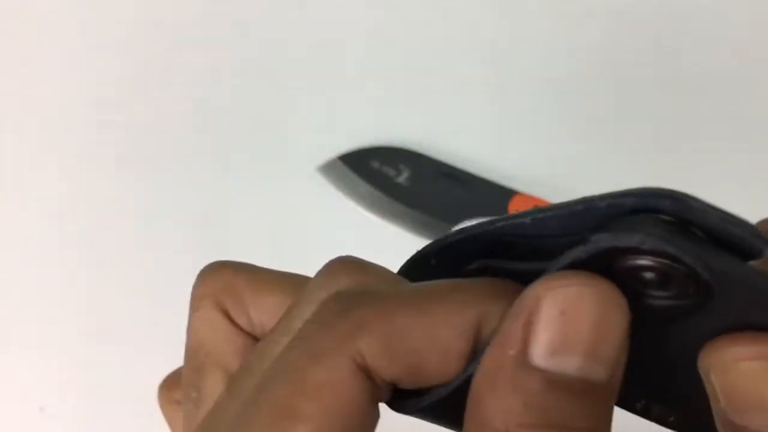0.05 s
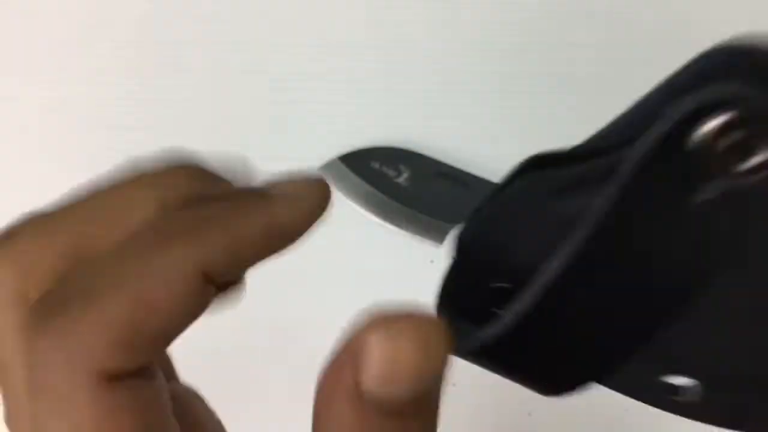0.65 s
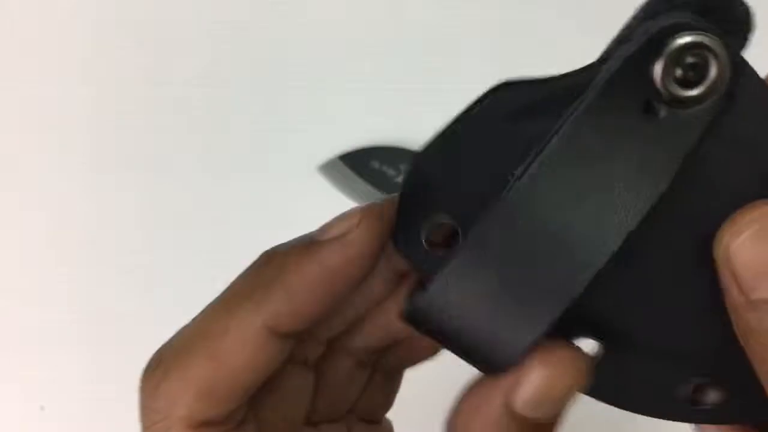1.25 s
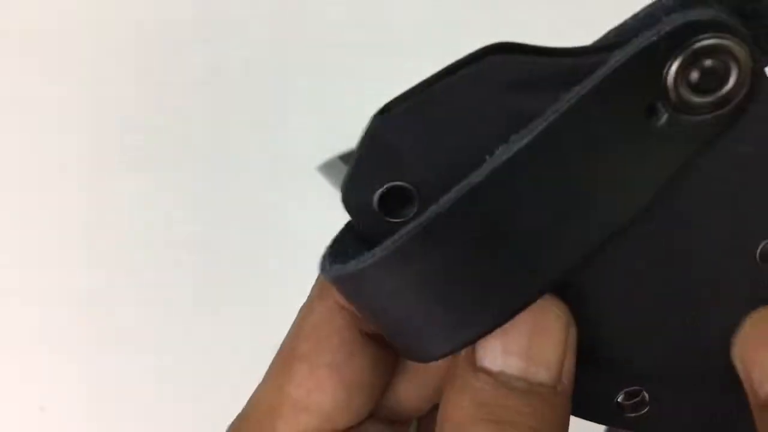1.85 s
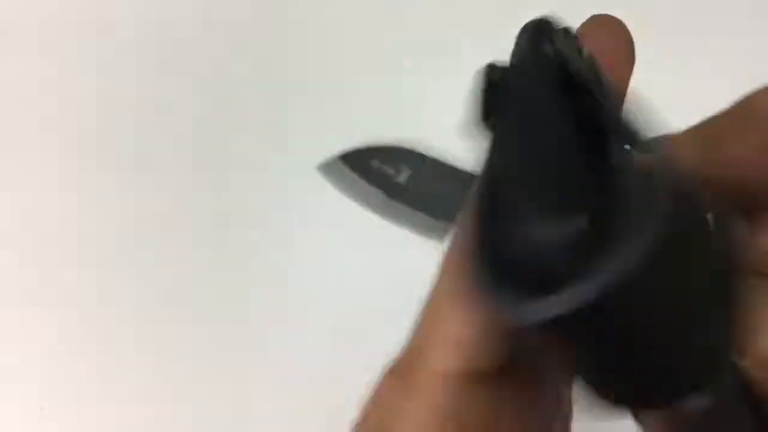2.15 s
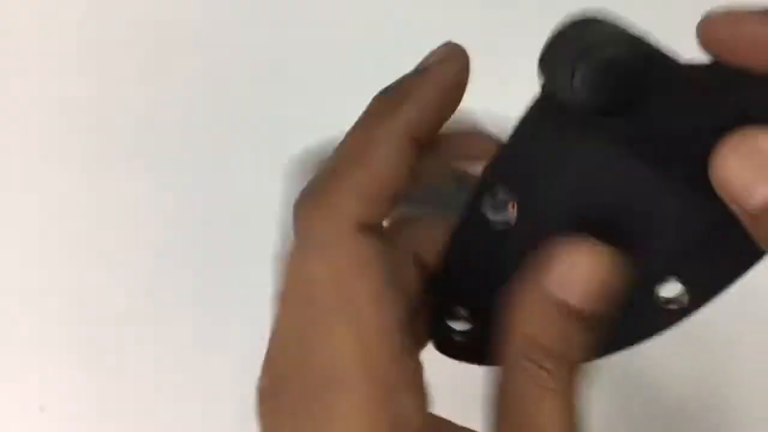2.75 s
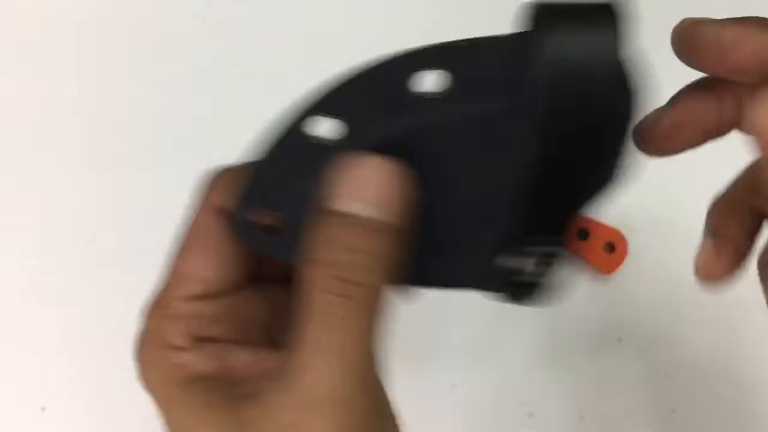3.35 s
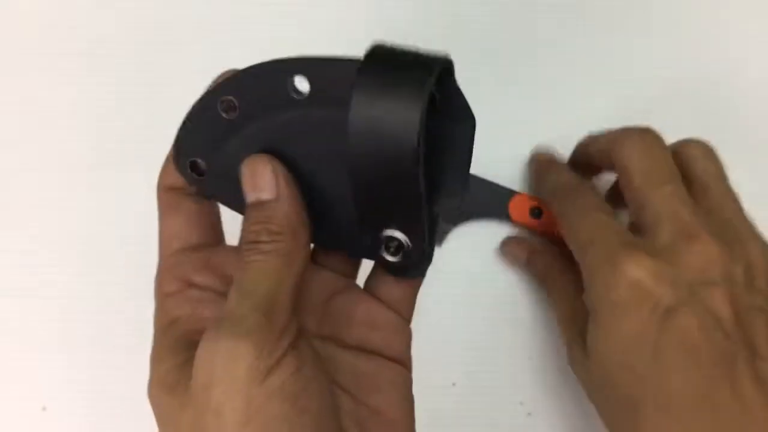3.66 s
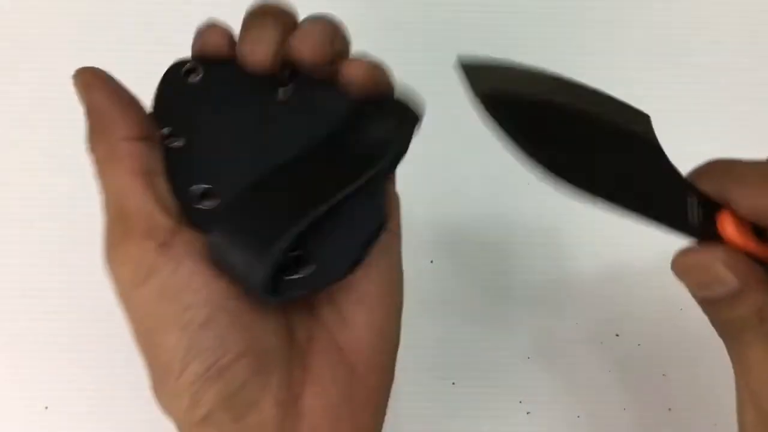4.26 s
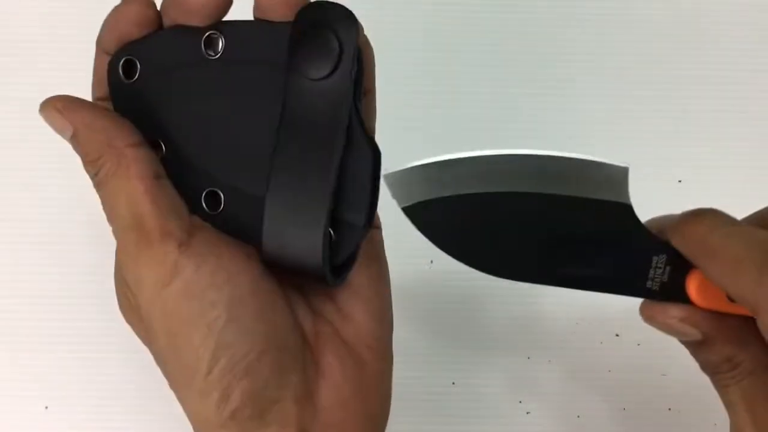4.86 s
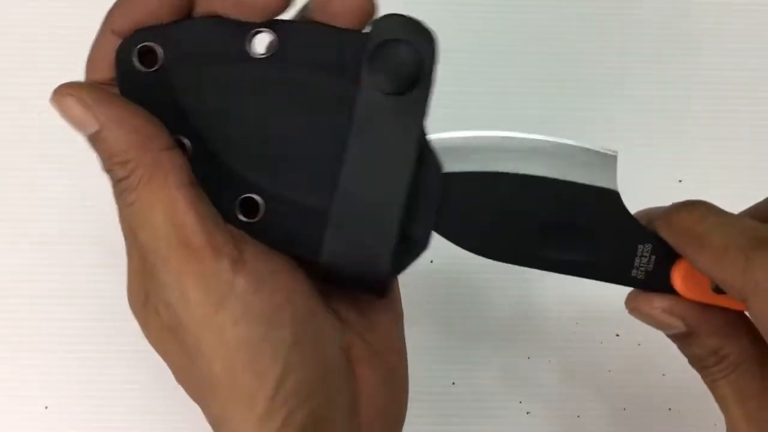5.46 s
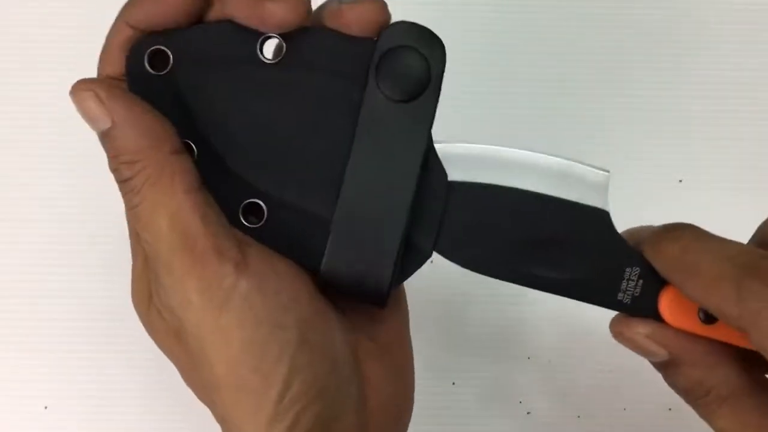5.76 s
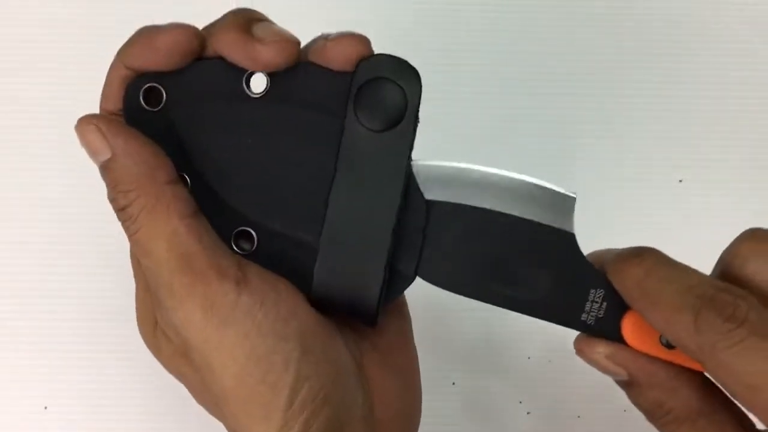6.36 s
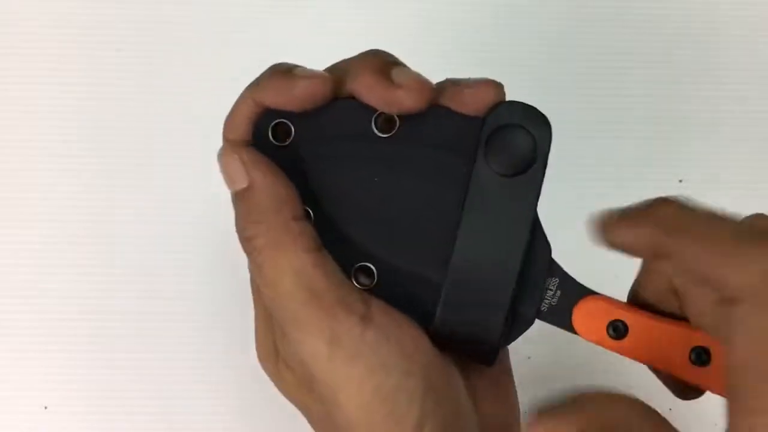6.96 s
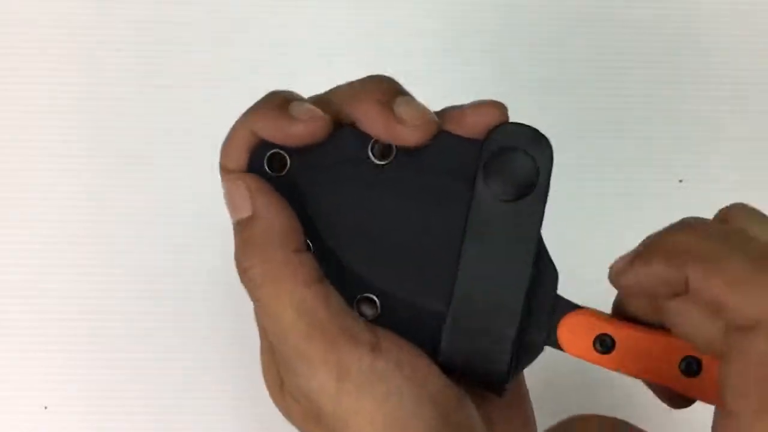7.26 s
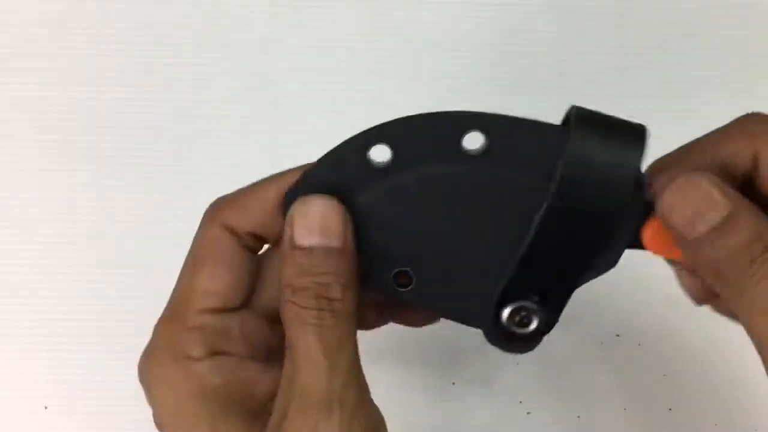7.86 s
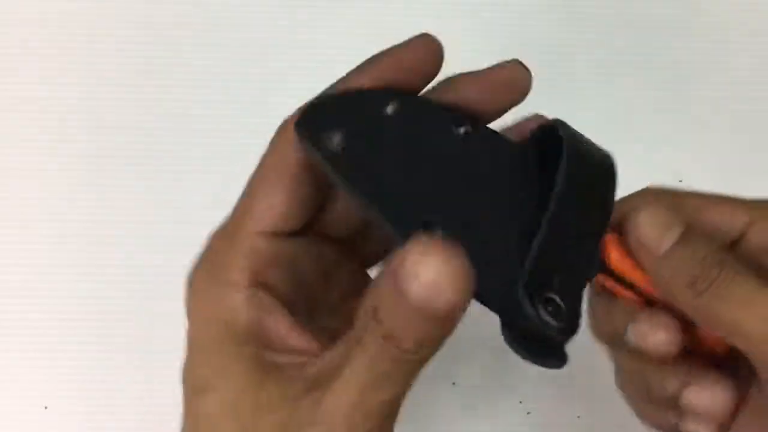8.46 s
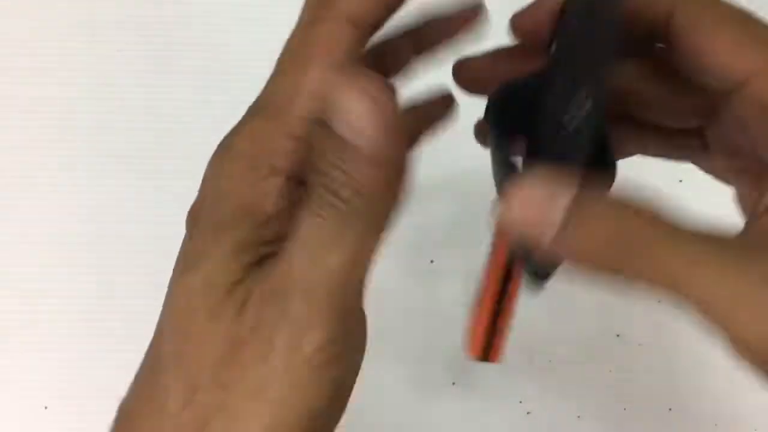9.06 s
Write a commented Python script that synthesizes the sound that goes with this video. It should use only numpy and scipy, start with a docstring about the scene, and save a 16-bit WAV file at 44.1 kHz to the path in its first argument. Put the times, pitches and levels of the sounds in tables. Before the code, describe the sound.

A stiff plastic sheath is handled with small clicks and rubs, then a knife blade scrapes in and locks with one loud snap.

```python
"""Knife and plastic sheath.

Hands turn a stiff sheath with a leather loop over a table in a quiet, ventilated room.
Fingers rub it, the loop and its snap stud tick against the shell, and a knife is picked up.
The blade sticks and slips along the hollow shell in short pushes, then locks with one loud snap.
Afterwards the sheathed knife rattles faintly."""
import sys
import numpy as np
from scipy import signal
from scipy.fft import rfft, irfft, next_fast_len
from scipy.io import wavfile
from scipy.ndimage import uniform_filter1d, map_coordinates

SR = 44100
rng = np.random.default_rng(int(sys.argv[2]) if len(sys.argv) > 2 else 0)


def transcribe(u):
    """Save the signal u as a 16-bit wav file named by the first command-line argument.

    u: samples, shape (n,) or (channels, n), limited to [-1, 1]; the rate is SR.
    q: integer samples, one column per channel.
    """
    v = np.clip(np.atleast_2d(u).T, -1, 1)
    q = np.round(v * 32767).astype(np.int16)
    wavfile.write(sys.argv[1], SR, q)


N = 405719


def amp(db):
    """Decibels to gain."""
    return 10 ** (np.asarray(db) / 20)


def unit(x):
    """Scales to rms 1."""
    return x / np.sqrt(np.mean(x ** 2) + 1e-20)


def lookup(points, hz):
    """Interpolates a table over log frequency."""
    f, value = np.transpose(points)
    return np.interp(np.log(hz + 1), np.log(f), value)


def add(mix, start_s, sound):
    """Mixes a sound in, in place."""
    part = mix[round(start_s * SR):][:len(sound)]
    part += sound[:len(part)]


def butter(x, order, hz, kind):
    """Butterworth filter."""
    return signal.sosfilt(signal.butter(order, hz, kind, fs=SR, output="sos"), x)


def resonate(x, hz, width_hz):
    """One resonance, peak gain 1."""
    return signal.lfilter(*signal.iirpeak(hz, hz / width_hz, SR), x)


def coloured(x, spectrum):
    """Shapes x by a spectrum; rms 1."""
    size = next_fast_len(len(x))
    gain = amp(lookup(spectrum, np.fft.rfftfreq(size, 1 / SR)))
    return unit(irfft(rfft(x, size) * gain, size)[:len(x)])


def drift(rate_hz):
    """Ramps between random values; rms 1."""
    knots = rng.standard_normal(8192)
    return unit(map_coordinates(knots, [np.arange(N) * rate_hz / SR], order=1, mode="wrap"))


def stroke(peak_s, rise_s, fall_s, power):
    """Start time and rise-fall envelope (rms 1)."""
    up = np.linspace(0, 1, int(rise_s * SR) + 2)
    down = np.linspace(1, 0, int(fall_s * SR) + 2)
    return max(peak_s - rise_s, 0), unit(np.concatenate([up, down]) ** power)


def friction(slips_per_s, spread_db, hiss_gain, flutter_hz, patch_db):
    """Tiny uneven slips over a hiss; the moving contact favours ever different narrow bands."""
    sizes = amp(spread_db * np.minimum(rng.exponential(1, N), 4)) * rng.choice([-1, 1], N)
    slips = unit(sizes * (rng.random(N) < slips_per_s / SR))
    grain = unit(slips + hiss_gain * rng.standard_normal(N)) * amp(2 * drift(flutter_hz))
    spectra = signal.stft(grain, SR, nperseg=512)[2]
    patches = uniform_filter1d(rng.standard_normal(spectra.shape), size=4, axis=0)
    patches = unit(uniform_filter1d(patches, size=12, axis=1))
    return unit(signal.istft(spectra * amp(patch_db * patches), SR, nperseg=512)[1][:N])


# knock, middle and tick bands: low/Hz, high/Hz
CONTACT_BANDS = [(700, 1400), (1400, 4000), (4000, 16000)]
def balance(x, span_s, level_db, knock_db, tick_db):
    """Sets each band's rms over the first span_s; knock and tick are relative to the middle."""
    out = np.zeros(len(x))
    for band_hz, db in zip(CONTACT_BANDS, (knock_db, 0, tick_db)):
        part = butter(x, 3, band_hz, "band")
        rms = np.sqrt(np.mean(part[:int(span_s * SR)] ** 2) + 1e-20)
        out += part * amp(level_db + db) / rms
    return out


# air rush spectrum: f/Hz, relative level/dB
RUSH_SPECTRUM = [(20, -31), (30, -8), (45, -1.5), (80, -3.5), (140, 1), (200, -1.5), (300, -8), (480, -14),
                 (1000, -14), (2000, -19.5), (3000, -28), (5000, -35), (9000, -37.5), (16000, -43)]
# mains and fan motor tones: f/Hz, rms level/dB
HUM_TONES = [(46.8, -68.5), (61.2, -68), (93.6, -60.5), (100, -62), (103.1, -66.5), (200, -73.5),
             (374.4, -73)]
def ventilation():
    """Low rush of air; wavering mains and fan tones beat against each other."""
    t = np.arange(N) / SR
    hum = np.zeros(N)
    for hz, db in HUM_TONES:
        phase = 2 * np.pi * (hz * t + rng.random()) + 0.22 * drift(rate_hz=1.7)
        hum += amp(db) * unit(np.sin(phase))
    return hum + amp(-56.5) * coloured(rng.standard_normal(N), RUSH_SPECTRUM)


# room decay: f/Hz, t60/s
ROOM_T60 = [(300, 0.25), (2000, 0.44), (6000, 0.34), (15000, 0.36)]
def room(x, delay_s, wall_db):
    """One wall echo and a diffuse tail in which each band's energy decays."""
    hz, t, spectra = signal.stft(x, SR, nperseg=256)
    power = uniform_filter1d(abs(spectra) ** 2, size=3, axis=0)
    smeared = uniform_filter1d(power, size=15, axis=0)
    blur = np.clip(hz / 3000 - 1, 0, 1)[:, None]  # high modes radiate differently to every wall
    power = (1 - blur) * power + blur * smeared
    retention = 10 ** (-6 * t[1] / lookup(ROOM_T60, hz))
    held = np.array([signal.lfilter([1 - k], [1, -k], band) for k, band in zip(retention, power)])
    scatter = signal.stft(rng.standard_normal(N), SR, nperseg=256)[2]
    tail = signal.istft(np.sqrt(abs(held)) * scatter / scatter.std(), SR, nperseg=256)[1][:N]
    return np.pad(tail + amp(wall_db) * x, (int(delay_s * SR), 0))[:N]


def table_bump(peak_s, rise_s, fall_s, level_db):
    """The hand lands softly on the table to pick up the knife."""
    out = np.zeros(N)
    start_s, weight = stroke(peak_s, rise_s, fall_s, power=1.6)
    spectrum = [(30, -20), (90, 8), (200, -5), (310, -3.5), (500, -23), (1500, -50)]  # f/Hz, level/dB
    thud = coloured(rng.standard_normal(len(weight)), spectrum)
    add(out, start_s, amp(level_db) * weight * thud)
    return out


# hiss spectrum: f/Hz, relative level/dB
HISS_SPECTRUM = [(1500, -36.5), (3000, -5), (4000, -5.5), (6000, -4), (9000, -6), (10500, -7.5),
                 (13000, -4.5), (16000, -13)]
# shell body spectrum: f/Hz, relative level/dB
BODY_SPECTRUM = [(300, -18), (700, 4.5), (1300, -1.5), (2000, 6), (2800, -7), (3600, -1.5), (5500, -19.5),
                 (16000, -44)]
# finger strokes, and the shell ringing near 1.9 kHz after the clack at 1.13 s:
# start/s, length/s, hiss/dB re bus, body/dB re hiss, rasp/Hz
RUBS_AND_RING = [(0.127, 0.65, -77, 1, 1980), (0.627, .05, -55, -3, 2000), (0.738, 0.012, -60, -8, 3200),
                 (0.834, 0.01, -59.5, -3, 3420), (0.93, 0.016, -67.5, -8, 3900),
                 (0.959, 0.12, -73, 4.5, 4000), (1.137, 0.058, -73, 15.5, 1860),
                 (1.336, 0.17, -68.5, 3, 3570), (1.799, 0.15, -69, 4, 3400), (2.002, 0.21, -64.5, 1, 3360),
                 (2.366, .12, -65.5, 0, 2020), (2.705, 0.17, -74, 6.5, 3300),
                 (2.89, 0.24, -71.5, 1.5, 2100), (3.201, .06, -69.5, -2.5, 2690),
                 (3.305, 0.12, -70, 2, 2690), (3.477, 0.34, -71, 4.5, 2420), (3.73, 0.18, -69, -20, 2380),
                 (3.928, 0.054, -62, -9, 2380), (3.979, 0.23, -72.5, 10.5, 1690),
                 (4.306, 0.055, -69, 2, 3330), (7.401, .24, -70.5, 3, 2150),
                 (7.715, 0.18, -73.5, 10.5, 2280), (8.202, 0.26, -78.5, 2, 2400),
                 (8.561, 0.038, -71, 1.5, 2400), (8.741, 0.4, -80, 2.5, 2380)]
def rubs_and_ring():
    """Fingers hiss over plastic, leather and table and stir the shell; once it rings after a clack."""
    out = np.zeros(N)
    grain = friction(slips_per_s=900, spread_db=0.5, hiss_gain=0.96, flutter_hz=77, patch_db=2.8)
    hiss, body = coloured(grain, HISS_SPECTRUM), coloured(grain, BODY_SPECTRUM)
    for start_s, length_s, hiss_db, body_db, rasp_hz in RUBS_AND_RING:
        rise_s = 0.75 * length_s
        start_s, envelope = stroke(start_s + rise_s, rise_s, length_s - rise_s, power=0.2)
        span = slice(int(start_s * SR), int(start_s * SR) + len(envelope))
        rasp = unit(resonate(resonate(grain[span], rasp_hz, width_hz=1200), rasp_hz, width_hz=1200))
        sound = hiss[span] + amp(body_db) * unit(body[span] + amp(-10.5) * rasp)
        add(out, start_s, amp(hiss_db) * envelope[:len(sound)] * sound)
    return out


# hand-damped shell modes: f/Hz, relative level/dB, t60/s
SHELL_MODES = [(712, -10.5, 0.034), (1085, -14, 0.036), (1285, -22.5, 0.022), (1600, -4, 0.026),
               (1902, 2, 0.023), (2435, 4, 0.0094), (3276, -1, 0.014), (4156, -1, 0.013), (5650, 0, 0.0073),
               (7180, -9, 0.0028), (9220, -9, 0.027)]
def contact(level_db, knock_db, tick_db, free_hz, top_hz=None):
    """A crack plus shell modes; the part the grip leaves free rings louder and longer."""
    if top_hz is None:
        top_hz = 9600 * 2 ** ((level_db + 42) / 56)  # stronger contacts are briefer, so reach higher
    t = np.arange(4096) / SR
    hz, db, t60_s = np.transpose(SHELL_MODES)[:, :, None]
    free = np.exp(-(np.log(hz / free_hz) / 0.087) ** 2)
    place, grip, side = rng.standard_normal((3, len(hz), 1))
    envelopes = amp(db + 7.5 * free + 2 * place - 60 * t / (t60_s * 1.2 ** free))
    modes = np.sign(side) * envelopes * np.sin(2 * np.pi * hz * (1 + 0.018 * grip) * t)
    crack_db = np.clip(7 - 0.18 * knock_db, -3, 9)  # glancing ticks are mostly crack
    burst = rng.standard_normal(len(t)) * amp(crack_db - 60 * t / 0.012)
    crack = signal.lfilter([1, -1], [1, -0.8], burst)  # high-pass
    hit = butter(modes.sum(0) + crack, 2, [600, min(top_hz, 19000)], "band")
    return balance(hit, 0.0049, level_db, knock_db, tick_db)


def faint_ticks(per_s, above_hiss_db, spread_db):
    """The loop or stud may tick during a rub or the ring, louder with stronger hiss."""
    out = np.zeros(N)
    tries = 4
    for start_s, length_s, hiss_db, *_ in RUBS_AND_RING:
        for chance, place, size in rng.random((tries, 3)):
            level_db = hiss_db + above_hiss_db + spread_db * (2 * size - 1)
            tick = contact(level_db, knock_db=-3, tick_db=-1, free_hz=2400)
            if chance < per_s * length_s / tries:
                add(out, start_s + place * length_s, tick)
    return out


# single taps: t/s, level/dB re bus, knock/dB, tick/dB, free part/Hz
SHELL_TAPS = [(0.673, -36, 4, -2, 1090), (1.0347, -44.5, -9, -15, 2140), (1.4867, -50.5, -5, -8, 2220),
              (1.61, -36.5, -1.5, -9, 1950), (2.032, -44.5, -12, 0, 2930), (2.092, -44, -15, -9, 3300),
              (2.4755, -45, -11, -7, 730), (2.5238, -46, -1, -7, 730), (2.619, -51.5, -19, -5, 740),
              (3.027, -46.5, -12, -12, 2730), (3.1179, -49, -18, 3, 2920), (3.384, -45, -26, -2.5, 3300),
              (3.5786, -52.5, -8, 0.5, 2900), (3.9026, -58.5, -6, 0, 2400), (3.9458, -58, -1, 2, 2400),
              (4.1686, -39.5, 5.5, -28, 1570), (5.1902, -38, 1, -2, 1310), (5.5258, -51, 4, -7, 1590),
              (5.739, -47.5, -0.5, -12, 1610), (5.7696, -59, -14, 2.5, 4260)]
def taps():
    """Stud, nail or blade tip strikes the shell once."""
    out = np.zeros(N)
    for start_s, level_db, knock_db, tick_db, free_hz in SHELL_TAPS:
        add(out, start_s, contact(level_db, knock_db, tick_db, free_hz))
    return out


# double contacts: t/s, gap/s, first/dB re bus, second/dB re bus, knock/dB, tick/dB, free part/Hz
SHELL_CLACKS = [(0.6792, 0.00416, -36.5, -36, 5.5, -8.5, 1090), (0.9058, 0.007, -43, -49, -8, -13.5, 2120),
                (1.1327, 0.012, -44.5, -31.5, -11, -0.5, 2220), (1.2366, 0.009, -43.5, -37, -8.5, -2, 2930),
                (1.599, 0.0061, -30.5, -37.5, -7, 0, 2020), (2.517, 0.013, -40.5, -38.5, -4, 1, 730),
                (2.6911, .0163, -41.5, -45.5, -8, -6, 726), (2.7734, .005, -45, -45, -11, 1.5, 2330),
                (3.631, 0.0092, -47, -53, -10, -2, 2800), (3.6737, 0.0062, -54.5, -53.5, -16, 5, 2680),
                (4.1398, 0.014, -46.5, -43, -13, 2.5, 1600),
                (6.8794, 0.0041, -36.5, -39.5, -6, -14.5, 2160),
                (8.872, 0.01, -40.5, -48.5, -12, 4.5, 3200)]
def clacks():
    """The shell rocks and hits twice; the second hit glances, thinner and brighter."""
    out = np.zeros(N)
    for start_s, gap_s, first_db, second_db, knock_db, tick_db, free_hz in SHELL_CLACKS:
        add(out, start_s, contact(first_db, knock_db, tick_db, free_hz))
        add(out, start_s + gap_s, contact(second_db, knock_db - 10, tick_db + 1, free_hz))
    return out


# knife ticks: t/s, level/dB re bus, tick/dB, top/Hz
KNIFE_RATTLES = [(7.5126, -55, -3.5, 6600), (7.6403, -52, 8, 7700), (7.767, -45, 9, 7850),
                 (7.817, -45.5, 5, 6060), (7.841, -51, 8.5, 6200), (7.8525, -58, 5, 6100),
                 (7.8682, -47, 9.5, 6750), (8.3076, -55.5, 5.5, 4340), (8.5202, -54.5, -7, 6000),
                 (8.7254, -60.5, 7.5, 10500), (8.8065, -57, 2, 8460), (8.8148, -59, 7, 7950),
                 (9.161, -58, 5.5, 8900)]
def rattles():
    """The sheathed knife ticks against the walls."""
    out = np.zeros(N)
    for start_s, level_db, tick_db, top_hz in KNIFE_RATTLES:
        add(out, start_s, contact(level_db, knock_db=-7, tick_db=tick_db, free_hz=6390, top_hz=top_hz))
    return out


# blade travel: t/s, depth/fraction
BLADE_DEPTH = [(5.5, 0), (6.5, 0.17), (6.78, 0.55), (6.85, 0.8)]
# scraped resonances: f/Hz, width/Hz, gain at depth 0/dB, gain at depth 1/dB
HOLLOW_MODES = [(872, 260, -1.5, -4), (1130, 180, 3, 2.5), (1567, 180, 5.5, 2), (1990, 130, 0, -2.5),
                (2280, 190, -6.5, 0.5), (2690, 97, -10.5, 0), (3180, 550, -10.5, -7), (3970, 88, -13, -19),
                (5560, 510, -18, -31), (9100, 710, -17, -19), (13000, 4700, -23, -29)]
def blade_friction():
    """Steel sticks and slips on plastic; the resonances change weight as the blade fills the hollow."""
    grit = friction(slips_per_s=2500, spread_db=3.5, hiss_gain=0.64, flutter_hz=190, patch_db=2.5)
    depth = np.interp(np.arange(N) / SR, *np.transpose(BLADE_DEPTH))
    ring = np.zeros(N)
    for k, (hz, width_hz, mouth_db, deep_db) in enumerate(HOLLOW_MODES):
        gain = amp(mouth_db) * (1 - depth) + amp(deep_db) * depth
        ring += (-1) ** k * gain * resonate(grit, hz, width_hz)
    return butter(ring, 2, 650, "high")


# short slides: peak/s, rise/s, fall/s, level/dB re bus, knock/dB, tick/dB
EDGE_SLIDES = [(2.425, 0.021, 0.019, -46.5, -8, -5), (3.05, 0.024, 0.054, -55, -4.5, -7.5),
               (4.09, 0.059, 0.028, -58, -1, -10), (5.351, 0.074, 0.039, -55.5, 0, -6.5),
               (5.514, 0.054, 0.067, -52, -8.5, -12), (5.77, 0.033, .03, -69, -8, 2),
               (5.945, 0.037, 0.046, -65.5, 0.5, -3), (7.007, 0.029, 0.008, -56, -30, -1),
               (7.223, 0.008, 0.017, -35, -7, -6), (7.232, 0.0045, 0.012, -29, -5.5, -2)]
def scrapes(ring):
    """A hard edge slides briefly on the plastic, louder with speed."""
    out = np.zeros(N)
    for peak_s, rise_s, fall_s, level_db, knock_db, tick_db in EDGE_SLIDES:
        start_s, speed = stroke(peak_s, rise_s, fall_s, power=0.98)
        slide = np.pad(speed * ring[int(start_s * SR):][:len(speed)], (0, 256))
        add(out, start_s, balance(slide, len(speed) / SR, level_db, knock_db, tick_db))
    return out


# one curve per push: t/s, rasp/dB re bus, grit/dB re rasp
PUSH_CURVES = [
    [(6.47, -86, -6), (6.486, -52, -7), (6.51, -38, -14.5), (6.528, -43, -10), (6.628, -47.5, -23),
     (6.666, -60, -15), (6.7, -82, -16)],
    [(6.768, -78, -3), (6.774, -48, -15), (6.832, -30.5, -16), (6.852, -31, -14.5), (6.864, -43, -8),
     (6.875, -46, -6)],
]
def pushes(ring):
    """Two longer pushes of the blade; rasp and grit follow the force of the hand."""
    out = np.zeros(N)
    for curve in PUSH_CURVES:
        times_s, level_db, grit_db = np.transpose(curve)
        span = np.arange(int(times_s[0] * SR), int(times_s[-1] * SR))
        rasp = unit(butter(ring[span], 3, 4000, "low"))
        grit = unit(butter(ring[span], 3, 4000, "high"))
        force = amp(np.interp(span / SR, times_s, level_db))
        grit_gain = amp(np.interp(span / SR, times_s, grit_db))
        add(out, times_s[0], force * (rasp + grit_gain * grit))
    return out


# air resonances of the sheath: f/Hz, width per stage/Hz, gain/dB
AIR_MODES = [(1660, 270, -4.5), (2000, 470, -3)]
def cavity(x):
    """The air inside the sheath rings."""
    return sum(amp(db) * resonate(resonate(x, hz, width), hz, width) for hz, width, db in AIR_MODES)


# modes of the shell stretched around the blade: f/Hz, relative level/dB, t60/s
CLAMPED_MODES = [(414, -28, 0.012), (606, -12.5, 0.024), (985, -12, .016), (1590, -2, 0.013),
                 (2035, 1, 0.024), (2380, -2, 0.031), (2600, -6.5, 0.021), (3250, 0.5, 0.021),
                 (4080, -2, 0.014), (4890, -8.5, 0.0028), (7000, 7.5, 0.0022), (13600, -8.5, 0.0036)]
# lock and rebound: t/s, gain/dB
LATCH_HITS = [(7.2330, -12.5), (7.2356, -26)]
def latch():
    """The sheath's lips spring shut behind the blade's shoulder: a crack, and every mode rings."""
    out = np.zeros(N)
    t = np.arange(4096) / SR
    modes = sum((-1) ** k * amp(db - 60 * t / t60_s) * np.sin(2 * np.pi * hz * t)
                for k, (hz, db, t60_s) in enumerate(CLAMPED_MODES))
    for start_s, gain_db in LATCH_HITS:
        burst = rng.standard_normal(len(t)) * amp(-2 - 60 * t / 0.01)
        crack = butter(burst, 1, [4000, 9000], "band")
        add(out, start_s, amp(gain_db) * (modes + crack))
    return out


def scene():
    """Mono mix of handling buses, snap, reflections and ventilation."""
    clicks = amp(-0.83) * (taps() + clacks() + rattles())
    ticks = faint_ticks(per_s=6, above_hiss_db=9.5, spread_db=8)
    ring = blade_friction()
    scraping = amp(-0.23) * (scrapes(ring) + pushes(ring))
    handling = clicks + ticks + scraping + amp(3) * rubs_and_ring()
    handling += table_bump(peak_s=3.685, rise_s=0.04, fall_s=0.1, level_db=-54)
    snap = latch()
    mouth = amp(-6) * cavity(snap)  # the sheath's mouth faces the room
    radiated = amp(-18) * handling + amp(-15.5) * snap + mouth
    radiated = butter(radiated, 1, 12000, "low")  # wall absorption
    reflections = room(radiated, delay_s=0.015, wall_db=-1)
    return (handling + snap + reflections + ventilation())[None]


def record(dry):
    """Steep low-pass at 16.05 kHz."""
    kernel = signal.firwin(401, 16050, window=("kaiser", 8), fs=SR)
    return signal.oaconvolve(dry, kernel[None], "same")


dry = scene()
out = record(dry)
transcribe(out)
```